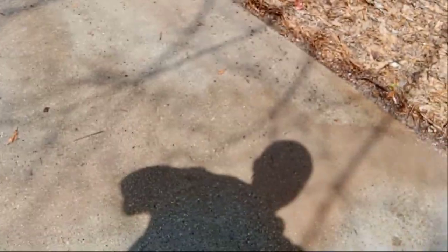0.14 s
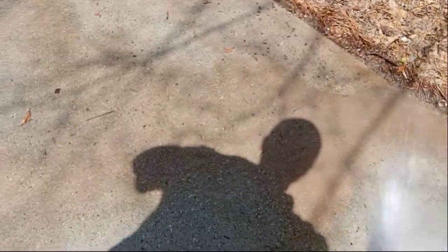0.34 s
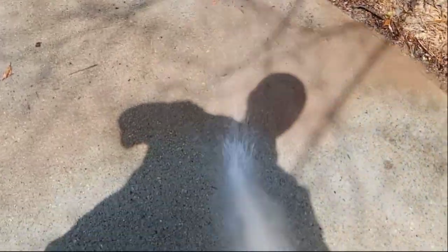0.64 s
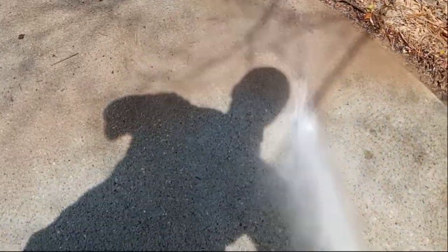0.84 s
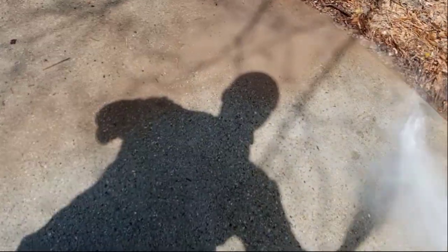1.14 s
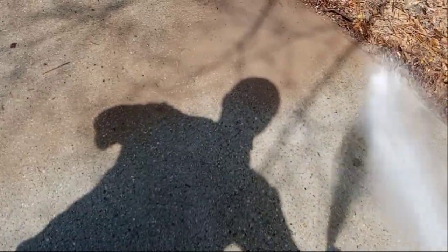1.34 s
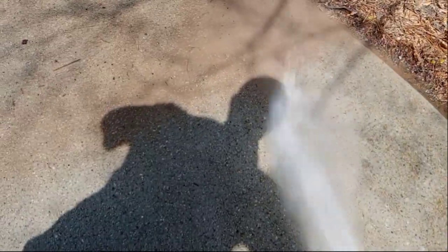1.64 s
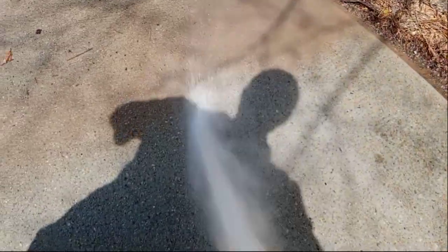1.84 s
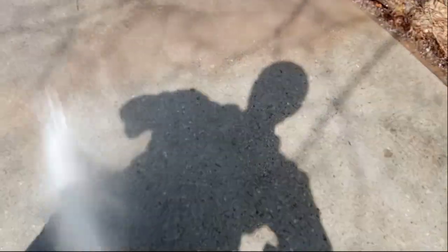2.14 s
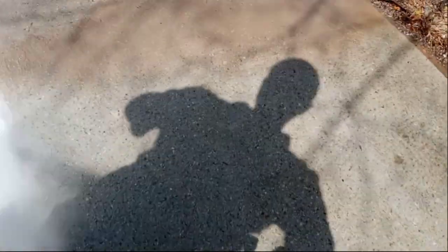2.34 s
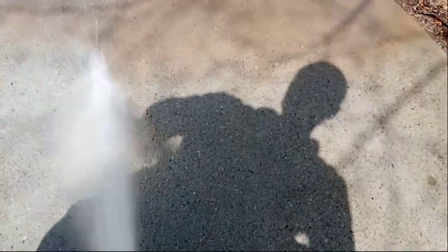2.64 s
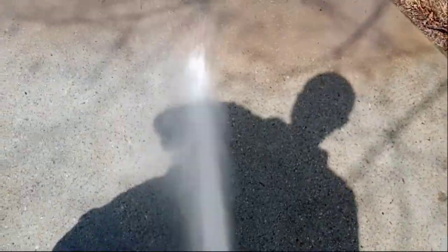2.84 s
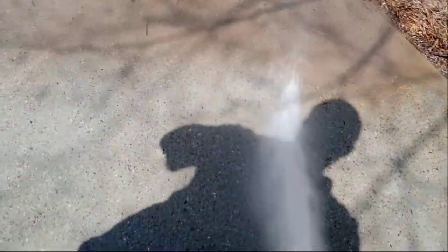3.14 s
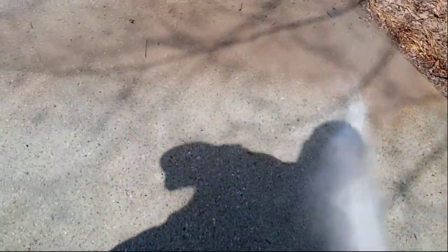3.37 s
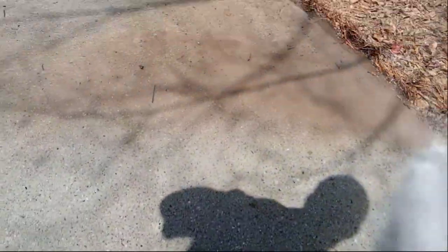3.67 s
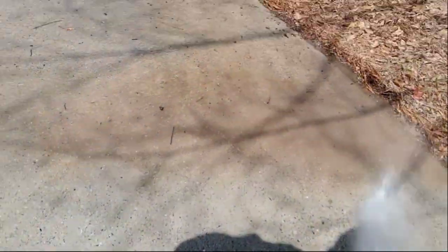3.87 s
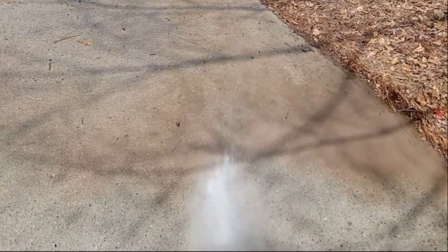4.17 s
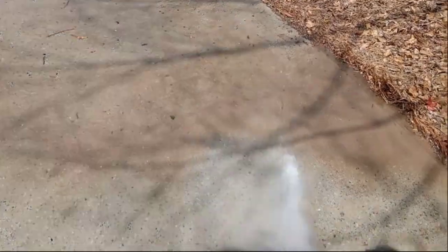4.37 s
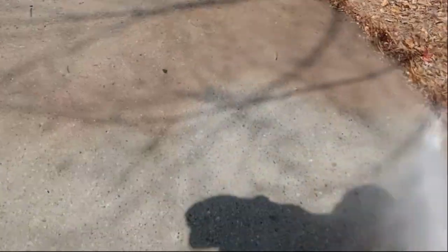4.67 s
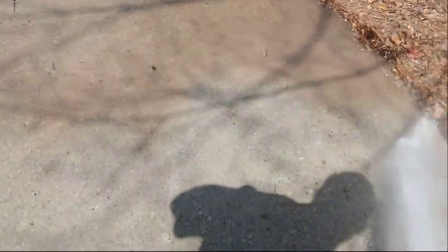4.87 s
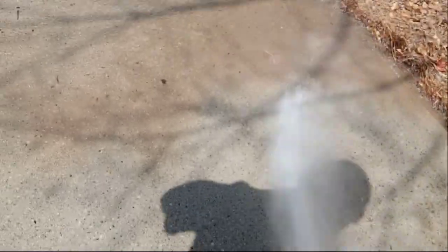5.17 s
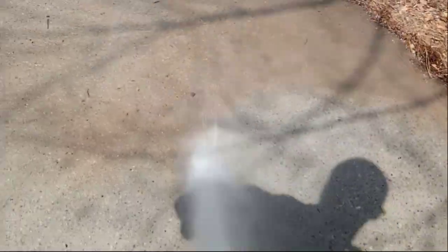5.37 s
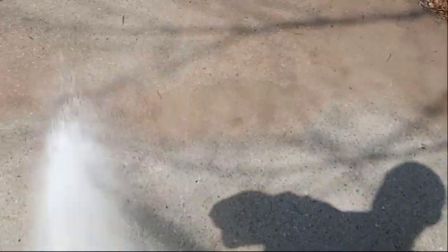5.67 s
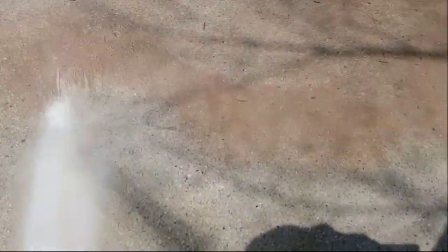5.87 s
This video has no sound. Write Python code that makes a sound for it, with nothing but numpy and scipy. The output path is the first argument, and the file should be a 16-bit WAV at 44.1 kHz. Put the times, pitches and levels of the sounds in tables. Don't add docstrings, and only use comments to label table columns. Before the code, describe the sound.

A steady, close roar of high-pressure water striking a wet slab, already running at the start and never stopping. Its level stays fairly even, but its tone glides with each sweep of the nozzle, like a slow phaser, moving between thinner and fuller hiss. Dry open air, essentially mono, slightly compressed treble, a distant low engine hum nearly masked.

```python
import sys
import numpy as np
from scipy import signal
from scipy.io import wavfile
from scipy.ndimage import uniform_filter1d, map_coordinates

SR = 44100
rng = np.random.default_rng(int(sys.argv[2]) if len(sys.argv) > 2 else 0)


def to_wav(s):
    ch = np.atleast_2d(s).T
    pcm = np.round(np.clip(ch, -1, 1) * 32767)
    wavfile.write(sys.argv[1], SR, pcm.astype(np.int16))


def undo_db(level):
    steps = np.asarray(level, float) / 20
    return 10 ** steps


N = 265041
SIZE, HOP = 1024, 128


def evened(x):
    return x / np.sqrt(np.mean(x ** 2) + 1e-20)


def read(points, hz):
    f, value = np.transpose(points)
    return np.interp(np.log(hz + 1), np.log(f + 1), value)


def drift(shape, size):
    field = uniform_filter1d(rng.standard_normal(shape[::-1]).T, size[0], axis=0)
    return evened(uniform_filter1d(field, size[1], axis=1))


def swing(t):
    # (time [s], aim [0 right to 1 left], reach [-1 near to 1 far],
    # lean of the body [-.5 to .5], jet level [dB])
    lance_points = [(0.0, 0.03, -1.04, -0.53, -0.2), (0.31, 0.06, -0.7, -0.32, -0.19),
                    (0.62, 0.24, -0.25, -0.37, 0.08), (1.14, 0.04, -0.27, -0.55, 0.58),
                    (1.72, 0.19, -0.15, -0.41, 0.79), (1.98, 0.4, 0.0, -0.07, -0.7),
                    (2.25, 0.64, 0.7, 0.08, -0.02), (2.38, 0.77, 0.85, -0.23, 0.63),
                    (2.64, 0.72, 0.69, 0.33, -1.35), (2.86, 0.36, 0.74, -0.02, -1.1),
                    (3.19, 0.19, 0.77, 0.11, 0.1), (3.81, 0.16, -0.4, -0.0, 0.27),
                    (4.24, 0.49, -0.31, 0.37, 0.5), (4.6, 0.19, -0.29, 0.02, 0.39),
                    (5.03, 0.23, -0.09, 0.2, 0.32), (5.49, 0.47, -0.37, 0.18, 1.06),
                    (5.71, 0.68, 0.16, 0.51, 0.51), (6.01, 0.78, -0.35, 0.55, 3.56)]
    s, *columns = np.transpose(lance_points)
    place = np.interp(t, s, np.arange(len(s)))
    return [map_coordinates(c, [place], order=3, mode="nearest") for c in columns]


def paths(hz, t):
    # (extra delay at aim 0 [ms], shift [ms per aim], shift [ms per reach])
    bounce_lags = [(0.069, 0.168, -0.002), (0.167, -0.036, -0.161), (0.185, -0.2, -0.093),
                   (0.209, -0.01, 0.019), (0.255, 0.159, 0.135), (0.257, -0.334, -0.046),
                   (0.315, -0.025, 0.004), (0.348, -0.317, -0.051), (0.372, 0.075, 0.049),
                   (0.415, -0.38, -0.037), (0.415, -0.381, -0.03), (0.43, -0.186, -0.059),
                   (0.54, -0.321, 0.171), (0.543, -0.266, -0.02), (0.662, -0.712, 0.199),
                   (0.677, -0.436, -0.06), (0.777, -0.378, -0.03), (0.801, -0.995, 0.007),
                   (0.882, -0.04, -0.0), (0.978, -0.803, 0.039)]
    bounce_shares = [(-0.49, -0.5, -0.32, 0.72), (0.038, 0.74, 0.58, 0.16), (0.099, 0.43, 0.23, 0.13),
                     (0.21, -0.88, 0.403, 0.13), (0.07, 0.069, 1.1, 0.87), (-0.25, 0.15, 1.33, 1.03),
                     (0.2, 0.34, 0.296, 0.2), (0.24, -0.76, 0.69, 0.76), (0.094, -0.39, 0.43, 0.22),
                     (-0.43, -0.37, 0.21, 0.28), (0.62, 0.24, -0.0002, 0.49), (-0.24, 0.18, -0.23, 1.17),
                     (-0.042, -0.37, 0.34, 0.73), (0.13, 0.17, 0.26, 0.37), (-0.24, 0.32, 0.71, 0.39),
                     (0.21, -0.17, 0.89, 0.69), (0.14, 0.2, 0.47, 0.61), (0.075, -0.0088, -0.025, 1.9),
                     (-0.15, -0.0047, 1.23, 1.25), (-0.071, 0.18, -0.4, 1.4)]
    dull_cycles = 6
    aim, reach, lean, _ = swing(t)
    total = 1
    for (ms, per_aim, per_reach), (share, per_lean, best, width) in zip(bounce_lags, bounce_shares):
        lag = (ms + per_aim * aim + per_reach * reach) / 1000
        facing = (share + per_lean * lean) * np.exp(-((aim - best) / width) ** 2)
        dull = 1 + (hz * lag / dull_cycles) ** 4
        total = total + facing / dull * np.exp(-2j * np.pi * hz * lag)
    return np.sqrt(abs(total) ** 2 + .01)


def washer():
    # (frequency [Hz], level [dB])
    wash_colour = [(20, -48), (50, -46), (100, -20.5), (172.0, -17.0), (287.0, -12.0), (517.0, -10.0),
                   (746.0, -9.5), (861.0, -6.0), (976.0, -7.0), (1206.0, -6.5), (1550.0, -9.5),
                   (1665.0, -7.5), (1895.0, -8.5), (2239.0, -2.0)]
    # (frequency [Hz], level [dB])
    jet_colour = [(2354.0, -3), (2814.0, -6), (3273.0, -5), (3388.0, -4), (3847.0, -5), (4077.0, -2.5),
                  (4536.0, -2.5), (4881.0, 0.7), (5111.0, -0.45), (6604.0, -1.5), (6718.0, -2),
                  (7293.0, -7.5)]
    # (frequency [Hz], level [dB])
    mist_colour = [(7407.0, -7), (8096.0, -12), (8900.0, -11.5), (9360.0, -15), (9819.0, -14.5),
                   (10508.0, -17.5), (12920.0, -22), (13379.0, -22.8), (13954.0, -22), (14643.0, -8),
                   (15561.0, -9)]
    # (slope [dB per aim], [dB per aim squared], [dB per aim cubed], [dB per lean])
    swells = [
        (17.6, -42.6, 30.2, -0.5),
        (-26.2, 75.6, -55.0, 4.7),
        (-37.5, 115.2, -99.8, 1.5),
    ]
    t = np.arange(N // HOP + 11) * HOP / SR
    hz = np.fft.rfftfreq(SIZE, 1 / SR)[:, None]
    aim, reach, lean, effort_db = swing(t)
    jet_db, wash_db, mist_db = np.array(swells) @ [aim, aim ** 2, aim ** 3, lean]

    low = 1 / (1 + (hz / 1500) ** 4)
    low = low * (1 - 0.14 / (1 + (hz / 350) ** 2))
    high = 1 - 1 / (1 + (hz / 7500) ** 8)
    level_db = read(wash_colour + jet_colour + mist_colour, hz) + effort_db + jet_db
    level_db = level_db + low * wash_db + high * mist_db

    slot_hz, slot_width_hz, slot_db, slot_aim = 3510, 190, -5.5, .56
    slot_band = np.exp(-((hz - slot_hz) / slot_width_hz) ** 2)
    level_db += slot_db * slot_band / (1 + np.exp((slot_aim - aim) / 0.044))

    stretch = np.clip(.89 - .55 * aim - .1 * reach, 0, 1)
    cells = np.broadcast_arrays(np.arange(len(hz))[:, None] * stretch, np.arange(len(t)))
    streaks = map_coordinates(drift(level_db.shape, size=(4, 90)), cells, order=1)
    streaks_db = 2.1 * hz / (hz + 900) * streaks
    patches_db = (0.34 + 1.2 * high) * drift(level_db.shape, size=(16, 16))
    flutter_db = (0.34 + 0.27 * low + 0.18 * high) * drift((1, len(t)), size=(1, 6))

    real, imaginary = rng.standard_normal((len(t), len(hz), 2)).T
    droplets = real + 1j * imaginary
    comb = np.repeat(paths(hz, t[1::3]), 3, axis=1)[:, :len(t)]
    spectrum = undo_db(level_db + streaks_db + patches_db + flutter_db) * comb * droplets
    hiss = signal.istft(spectrum, nperseg=SIZE, noverlap=SIZE - HOP)[1][:N]
    return undo_db(-14.5) * evened(hiss)


def engine():
    # (order [multiple of firing rate], level [dB rms])
    orders = [(2, -79), (3, -64.5), (4, -57.5), (5, -58), (6, -57.5), (7, -54.5), (8, -58), (9, -51.5)]
    firing_hz = 29.34
    waver = evened(uniform_filter1d(rng.standard_normal(N), size=3000))
    firings = np.cumsum(firing_hz * (1 + 0.02274 * waver)) / SR
    hum = 0
    for order, db in orders:
        hum = hum + np.sqrt(2) * undo_db(db) * np.sin(2 * np.pi * (order * firings + rng.random()))
    return hum


def scene():
    return np.tile(washer() + engine(), (2, 1))


def roll_off(x):
    return signal.sosfilt(signal.butter(12, 17100, fs=SR, output="sos"), x)


def record(dry):
    # (time [s], length [s], centre [Hz])
    dropouts = [(.107, .05, 12400), (.267, .04, 13100), (.392, .03, 12400), (.476, .04, 11700),
                (.795, .03, 12400), (.842, .04, 11700), (1.097, .07, 13100), (1.666, .05, 12400),
                (2.763, .04, 11700), (3.184, .05, 11000), (4.809, .035, 12400), (4.897, .03, 12400),
                (5.831, .035, 11700), (5.939, .03, 13100)]
    # (time [s], low edge [Hz], high edge [Hz])
    wide_bursts = [
        (1.094, 10300, 11750),
        (2.626, 7550, 10350),
        (2.626, 11000, 12450),
        (2.626, 13100, 14500),
        (3.393, 5150, 6300),
        (3.439, 9650, 11050),
        (3.439, 13750, 15700),
        (3.927, 6300, 8300),
        (3.927, 8950, 10400),
    ]
    ceiling = .98
    limited = ceiling * np.tanh(dry[0] / ceiling)
    hz, t, mid = signal.stft(limited, SR, nperseg=SIZE, noverlap=SIZE - 2 * HOP)
    mid[hz > 15740] = 0
    for s, length, centre in dropouts:
        mid[np.ix_(abs(hz - centre) < 345, abs(t - s) < length / 2 - .006)] = 0

    dips = rng.random((len(t) // 2 + 1, 5)).T < .045
    dips = np.repeat(np.repeat(dips, 16, 0), 2, 1)[:, :len(t)]
    mid[239:319] *= 1 - .85 * dips

    real, imaginary = rng.standard_normal((*mid.shape, 2)).transpose(2, 0, 1)
    size = np.sqrt(uniform_filter1d(abs(mid) ** 2, size=15, axis=0) + 1e-20)
    wide_noise = undo_db(1.5) * size * (real + 1j * imaginary)
    side = np.zeros_like(mid)
    for s, low, high in wide_bursts:
        cell = np.ix_((hz > low) & (hz < high), abs(t - s) < .009)
        side[cell] = wide_noise[cell]
        mid[cell] *= undo_db(-1.5)
    stereo = np.array([mid + side, mid - side])
    both = signal.istft(stereo, nperseg=SIZE, noverlap=SIZE - 2 * HOP)[1][:, :N]
    return roll_off(both)


dry = scene()
out = record(dry)
to_wav(out)
```